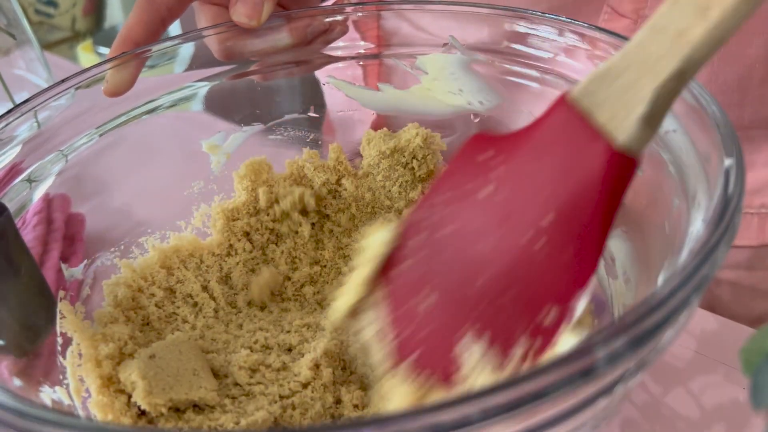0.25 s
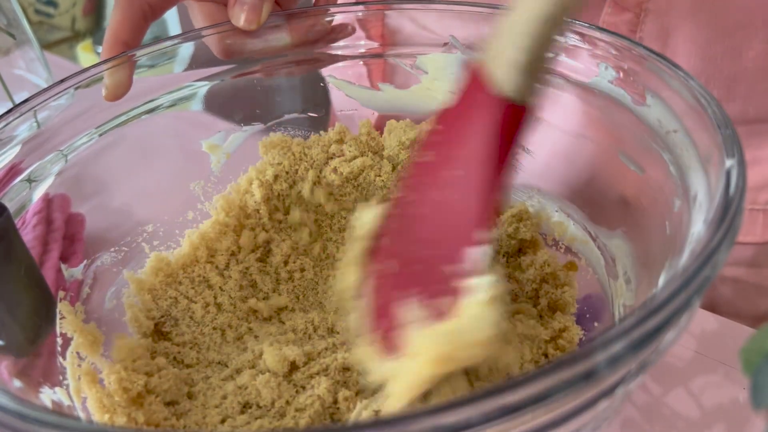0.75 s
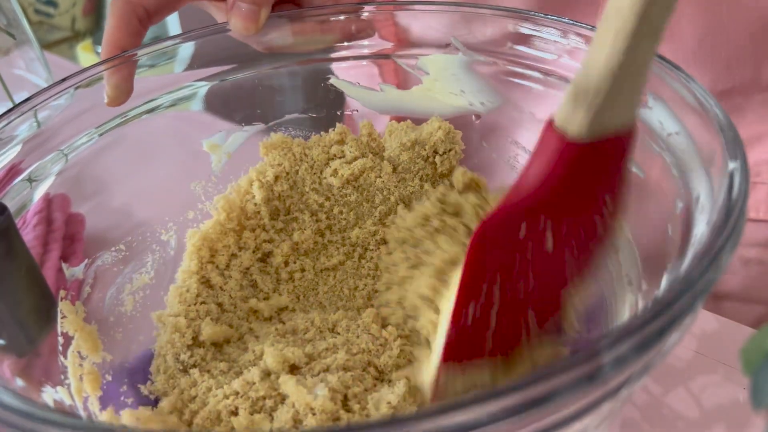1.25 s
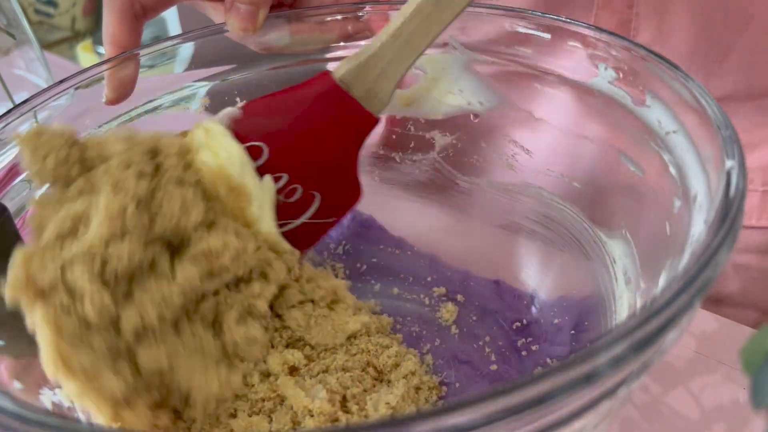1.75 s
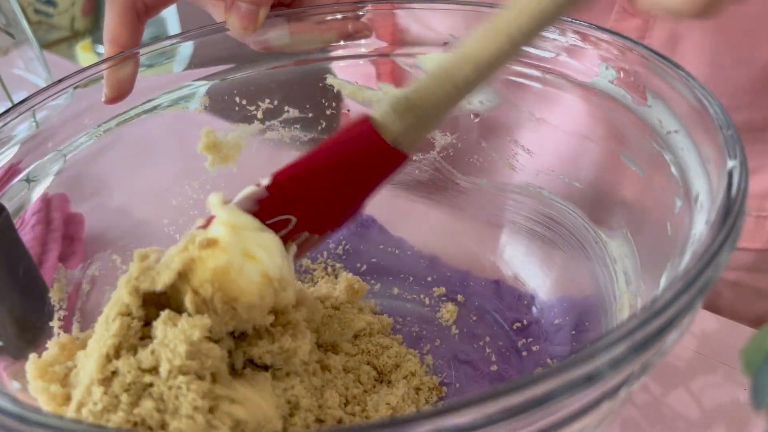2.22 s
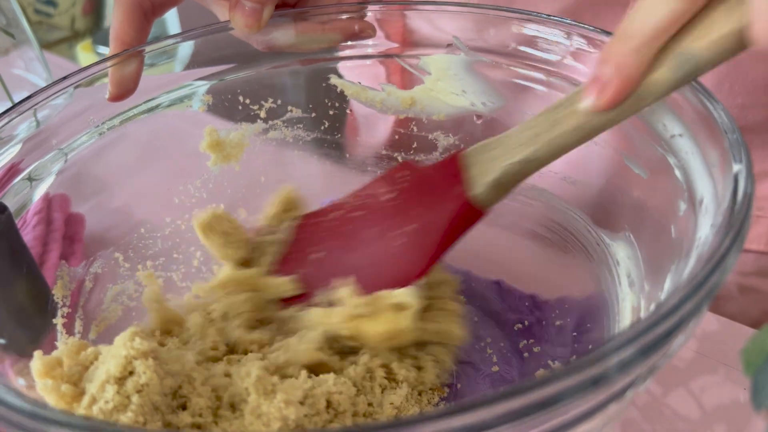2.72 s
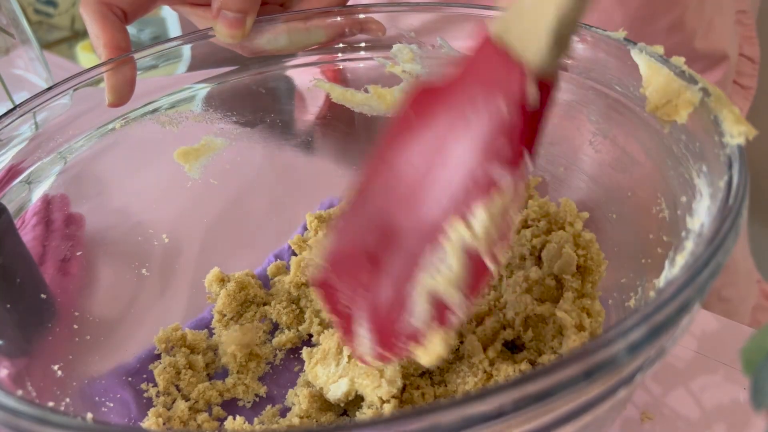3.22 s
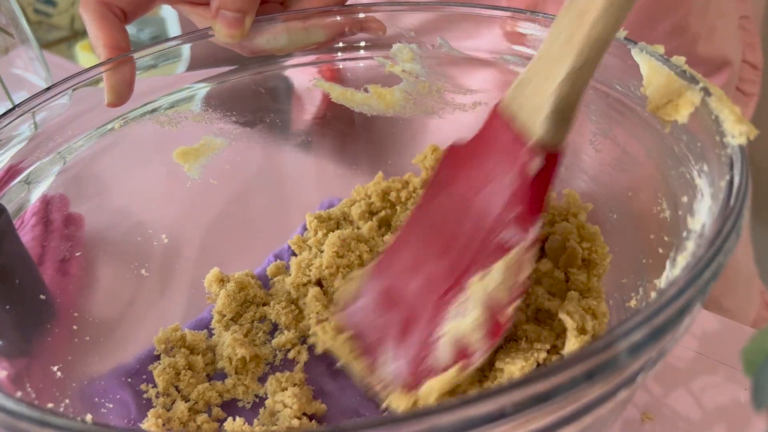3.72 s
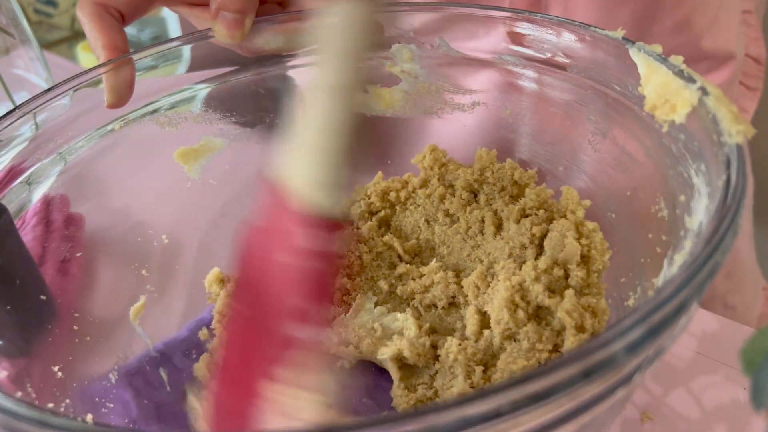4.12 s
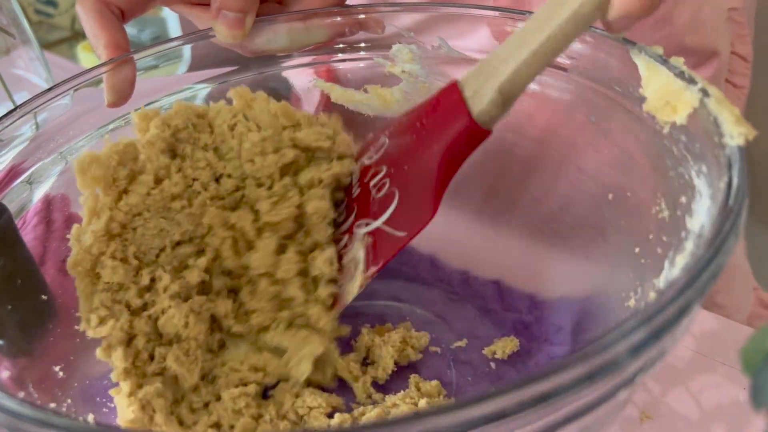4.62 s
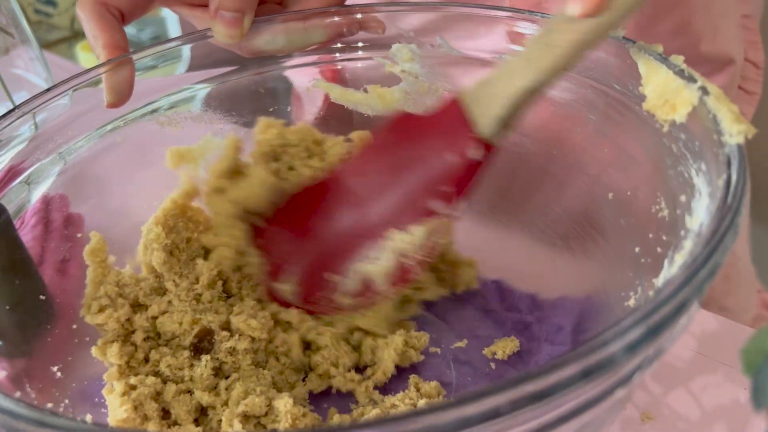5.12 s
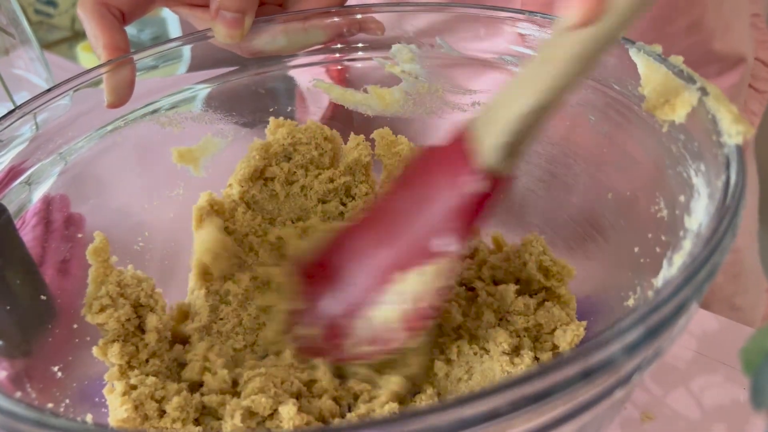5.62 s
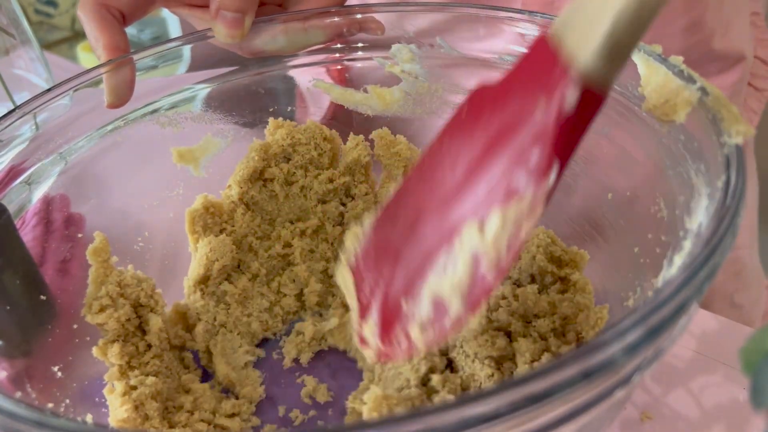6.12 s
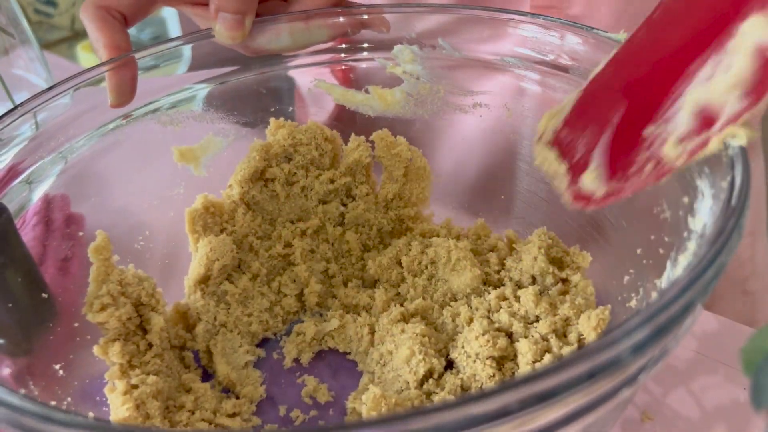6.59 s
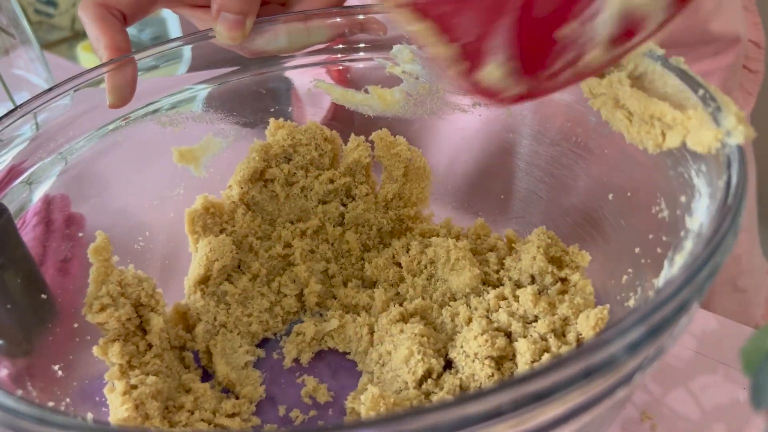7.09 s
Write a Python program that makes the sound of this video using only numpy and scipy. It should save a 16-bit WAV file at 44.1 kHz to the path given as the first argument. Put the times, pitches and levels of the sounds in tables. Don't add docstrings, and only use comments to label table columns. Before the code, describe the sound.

A silicone spatula pushes and sweeps damp, gritty sugar around a glass bowl, then knocks ringing glass and taps the rim over a low fridge hum.

```python
import sys
import numpy as np
from scipy import signal
from scipy.fft import rfft, irfft, next_fast_len
from scipy.io import wavfile
from scipy.ndimage import uniform_filter1d

SR = 44100
rng = np.random.default_rng(int(sys.argv[2]) if len(sys.argv) > 2 else 0)


def put_to_file(sound):
    columns = np.atleast_2d(sound).T
    safe = np.clip(columns, -1, 1)
    whole_steps = np.round(safe * 32767)
    wavfile.write(sys.argv[1], SR, whole_steps.astype(np.int16))


def gain_from_db(level_db):
    decades = np.asarray(level_db, float) / 20
    return 10 ** decades


N = 324135
STEP = 64

# pitch_hz [Hz], level_db [dB per Hz]
RUMBLE_COLOUR = [(13, -84), (22, -8), (59, -0.5), (131, -2.5), (204, -9), (247, -9.5), (302, -17),
                 (700, -39), (910, -47), (1540, -120)]
HISS_COLOUR = [(290, -5.5), (500, -7.5), (600, -27), (900, -17.5), (1200, -18.5), (2300, -18.5),
               (2700, -27), (3750, -28.5), (12500, -34), (13500, -38), (16000, -61)]
# pitch_hz [Hz], width_hz [Hz], level_db [dB]
MOTOR_TONES = [
    (51.03, 4.2, -50),
    (62.1, 11, -50),
    (119.18, 9.8, -50.5),
    (173.57, 7.6, -58),
    (239.3, 4.1, -59.5),
]
# pitch_hz [Hz], level_db [dB per Hz]
FIZZ_COLOUR = [(1200, -22), (2000, -6), (3500, -5), (6100, -6), (7500, -1), (9000, 1), (10400, -9),
               (11800, -1), (13800, -6), (15300, -5)]
DRAG_COLOUR = [(210, -47), (350, 2), (542, -3), (597, -2), (868, -12.5), (1260, -4), (1960, -4.5),
               (2470, -6.5), (3200, -8), (4500, -9.5), (5850, -16), (9900, -120)]

# start_s [s], hold_s [s],
# pressure_db [dB], flatness_db [dB], dryness_db [dB]
SLIDES = [(0.0, 0.11, -80, 13.5, -12), (0.352, 0.2, -81, 13.5, -11.5), (0.591, 0.035, -77.5, 14, -18),
          (2.001, 0.046, -69.5, -12, -23), (2.11, 0.088, -71.5, -21, -16), (2.234, 0.11, -75, -8, -12.5),
          (3.266, .12, -73.5, 5, -13.5), (2.964, 0.052, -92.5, 20.5, -7), (3.653, 0.089, -75, 5, -11),
          (4.626, 0.058, -84, 13, -14), (4.882, 0.081, -83.5, 10.5, -13), (4.991, 0.22, -69.5, 6.5, -12),
          (5.525, .1, -71, 7.5, -11), (5.929, 0.039, -74.5, 6, -10.5), (7.104, 0.038, -78.5, -8, -18),
          (2.385, 0.062, -89.5, 6, -10), (5.698, 0.082, -92, 5, -7), (5.85, 0.036, -80, 14, -13),
          (2.466, 0.087, -81.5, 8, -15),
    (2.575, .03, -80.5, 11.5, -21),
    (2.606, 0.042, -73.5, 12, -13),
    (2.654, 0.098, -74, 14.5, -13),
    (6.404, 0.028, -83, 5, -20),
    (6.443, 0.025, -79.5, 14, -23),
    (6.346, 0.01, -75.5, 15, -20),
    (6.404, 0.12, -87, 19.5, -24),
    (6.536, 0.048, -73.5, 6, -21),
    (6.66, 0.2, -77.5, 7, -19),
]
# start_s [s], hold_s [s], pressure_db [dB], flatness_db [dB],
# dryness_db [dB]
JABS = [
    (0.463, 0.027, -77.5, 15, -16),
    (0.859, 0.0071, -69.5, 8.5, -8),
    (2.857, 0.03, -77, 12.5, -18),
    (3.193, 0.063, -77, 9, -7),
    (3.956, 0.0065, -66.5, 1.5, -4.5),
    (4.713, 0.1, -84.5, 8.5, -17),
    (2.518, .016, -69, 3.5, -10),
    (3.573, .035, -77, 9.5, -12),
    (5.42, 0.046, -73, 6.5, -8.5),
]
# time_s [s], pressure_db [dB], flatness_db [dB], hollow_db [dB re pressure],
# hollow_hz [Hz]
SWEEPS = [
    [(.875, -72, 7.5, -14, 1630), (.92, -68.5, 0.5, -8, 1540), (1.03, -65, 6.5, -5, 1300),
     (1.12, -61.5, -5, -3, 1340), (1.2, -62, 0, 4, 1210), (1.26, -68, 5, 9, 1177),
     (1.33, -62, 0, -10, 1300), (1.6, -66.5, 0.5, -4.5, 1250), (1.86, -82.5, 5.5, 0, 1170),
     (1.98, -76.5, -2, -29, 1300)],
    [(3.99, -90.5, 22, -7, 1440), (4.05, -78.5, 10.5, -7, 1520), (4.12, -66.5, 2, -29, 1490),
     (4.2, -65.5, 1.5, -5, 1310), (4.285, -66, 2.5, 6, 1300), (4.35, -65, 0, 2, 1300),
     (4.44, -63.5, -2, -12, 1350), (4.5, -66, 0.5, -12, 1400), (4.515, -71.5, 1, -12, 1400),
     (4.58, -80.5, 6, -9, 1440)],
]

# start_s [s], peak_db [dB], pitch_hz [Hz]
SNAPS = [(.4703, -37, 3200), (.8625, -45, 8300), (1.0973, -41, 3500), (1.1098, -37, 9300),
         (1.1522, -33, 6500), (1.2268, -35, 7000), (1.2707, -30, 10000), (1.2805, -35, 11500),
         (1.5986, -26, 11000), (2.5212, -50, 11500), (2.6583, -26, 5000), (2.856, -55, 2750),
         (3.192, -56, 7000), (3.2682, -50, 7500), (4.7255, -46, 9300), (4.9238, -55, 9000),
         (5.4565, -44, 7000), (6.504, -46, 4000), (6.5678, -40, 6500), (6.7966, -37, 4300),
         (6.4045, -41, 8000), (6.5902, -37, 8000)]
# start_s [s], peak_db [dB], pitch_hz [Hz],
# length_ms [ms]
TAPS = [(2.389, -55.5, 2200, 0.47), (2.6355, -27.5, 3140, 1.1), (2.6583, -30.5, 1800, 0.18),
        (3.9546, -51, 2600, .35), (6.322, -45.5, 940, 2.9), (6.3235, -31, 11000, 1.3),
        (1.27, -34, 15000, .3), (1.2705, -40, 6000, .4), (3.79, -60, 12000, .6), (6.3485, -39, 9400, 1.4),
        (6.5678, -41, 11000, .8), (1.5987, -38, 15000, .3), (1.097, -42, 12500, .3),
        (6.4045, -54, 6200, .5), (6.4512, -48, 13500, .5), (6.7397, -50, 4500, 0.45),
        (6.7968, -51, 5900, .5), (6.7757, -54, 3880, 2.5), (7.341, -39, 7700, 1.8)]
# start_s [s], hold_s [s], level_db [dB], pitch_hz [Hz]
POCKETS = [(.9, .055, -70, 1800), (1, .045, -62, 2700), (1.02, 0.016, -60, 1270), (1.055, .02, -68, 2900),
           (1.12, .01, -64, 1300), (1.175, .02, -62, 1280), (1.268, .015, -60, 1250),
           (1.273, .012, -67, 2500), (1.34, 0.053, -62, 1560), (1.355, .025, -62, 2200),
           (1.373, .02, -73, 4150), (1.645, .02, -68, 1800), (1.64, .03, -68, 1150), (4.15, .04, -73, 3650),
           (4.1, .02, -69, 2600), (4.16, .025, -66, 2800), (4.185, .05, -70, 2080), (4.183, .02, -71, 1340),
           (4.266, .03, -60.5, 1300), (4.25, 0.054, -73, 4150), (4.315, .05, -67, 2550),
           (4.343, .01, -62, 1300), (4.37, .025, -61, 1700), (4.41, .015, -64, 1500),
           (5.525, .03, -78, 3150), (5.58, .05, -74, 10000), (5.94, 0.037, -78, 9000),
           (2.869, .02, -70, 1350), (7.095, .055, -76, 6000), (2.11, 0.074, -73, 7700),
           (2.24, 0.037, -74, 6800), (3.575, .025, -74, 3030), (3.3, 0.067, -72, 2850),
           (3.265, .03, -72, 7500), (3.36, 0.033, -78, 9100)]
# start_s [s], hold_s [s], level_db [dB],
# pitch_hz [Hz]
LINGERS = [(1.63, .04, -72, 5262), (1.71, .05, -72, 5262), (1.805, .03, -76, 5262), (1.68, .07, -72, 7030),
           (1.615, .05, -74, 3710), (2.637, .013, -50, 5262), (2.675, .075, -62, 5262),
           (5.65, .1, -80, 3710), (5.96, .07, -78, 3710), (6.325, .02, -58, 5262), (6.405, .02, -62, 5262),
           (6.452, .035, -64, 5262), (6.505, .02, -68, 5262), (6.644, .015, -66, 5262),
           (6.644, .008, -60, 9480), (6.675, .01, -68, 5262), (6.72, .01, -70, 5262),
           (6.798, .01, -64, 5262), (6.824, .012, -68, 5262), (6.59, .015, -60, 3710),
           (6.453, .035, -70, 14800)]
# start_s [s], hold_s [s], level_db [dB], tilt_db [dB per octave]
RUBS = [(1.547, 0.11, -93, 19.5), (1.646, 0.11, -79, 1.5), (3.664, 0.049, -81, -6), (4.324, 0.2, -81.5, 13),
        (4.6, 0.2, -92, -6), (4.882, 0.18, -83.5, -5.5), (5.184, 0.087, -87, -6), (5.543, 0.14, -81, -6),
        (5.88, 0.11, -79.5, -6.5), (6.362, 0.013, -69.5, -7), (6.425, 0.15, -92, -7),
        (6.527, 0.039, -66, -5), (6.61, 0.059, -76.5, -6.5), (6.704, 0.039, -71.5, -5.5),
        (6.756, 0.039, -72, -2.5), (1.68, .008, -77, -4), (1.71, .04, -84, 3), (1.908, .015, -80.5, -5),
        (5.597, .015, -76, -4)]
# start_s [s], level_db [dB], pitch_hz [Hz],
# length_cycles [cycles]
THUMPS = [(1.549, -38.5, 424, 1.2), (2.011, -51.5, 1090, 1.8), (2.6375, -29, 510, 3.8),
          (2.6355, -30.5, 753, 2.3), (2.6355, -35, 2387, 22), (2.705, -43, 613, 7.1),
          (2.67, -39.5, 570, 5.5), (2.6353, -27.5, 1060, 2.4), (2.637, -33.5, 322, 1.5),
          (2.652, -41, 416, 2.2), (2.668, -41, 430, 2.1), (2.722, -44, 487, 8), (2.638, -37, 176, 2.7),
          (2.645, -37, 85.5, 2.1), (2.675, -37, 119, 3.9), (2.795, -50, 340, 3), (3.953, -50, 1924, 14),
          (5.565, -56, 524, 4.2), (6.321, -33, 237, 3.1), (7.3343, -54, 1530, 7.3),
          (7.3415, -39.5, 2090, 5.1), (6.324, -46.5, 600, 4.4), (6.465, -62, 596, 3.4),
          (7.341, -38.5, 1455, 15), (7.342, -28, 650, 1.9), (7.345, -27.5, 249, 3.5)]

GLASS_HZ = [1373, 2405, 3295, 3710, 3900, 5262, 7030, 7289, 8200, 8980, 9480, 11200, 14800, 595]
# struck_db [dB], rubbed_db [dB], t60_s [s to fall 60 dB]
GLASS = [(-14.5, -13, 1), (-2, -9, 0.24), (-15.5, -37, 0.47), (-1.5, 4.5, 0.62), (-4, -4, .08),
         (-5, 0, 0.45), (-9, -9, 0.18), (-3, 2.5, 0.25), (-14, -34, 0.29), (-33, -10, 0.26),
         (-2.5, -5, 0.12), (-2.5, -12, 0.17), (-14, -19, .2), (-12, -13.5, 0.16)]
# start_s [s], blow_db [dB], hardness_db [dB per octave], free_s [s until the blade damps it]
KNOCKS = [(2.6348, -24, -5, 0.014), (1.8292, -66, 8.5, 0.039), (6.322, -34, 2, 0.013),
          (6.333, -48.5, 6.5, 0.007), (6.3485, -39.5, 3, 0.005), (6.53, -60, 5, 0.0085),
          (6.675, -64, 5, .008), (6.718, -53, -2, .008), (6.858, -58, 2.5, .008), (6.3554, -44, 4.5, 0.012),
          (6.372, -42.5, 2, 0.0045), (6.4033, -45.5, 2.5, 0.012), (6.4114, -50, -10, 0.013),
          (6.4505, -50, 6.5, 0.0059), (6.4634, -49, -3, 0.02), (6.5031, -49.5, 3, 0.043),
          (6.5426, -42, 2, 0.016), (6.5524, -47, 6.5, 0.0045), (6.5678, -48, 2, 0.004),
          (6.5889, -41.5, 0.5, 0.0032), (6.6437, -60, 6, 0.0063), (6.7394, -55, 3, 0.008),
          (6.7755, -69, 0, 0.021), (6.7966, -48, 2.5, 0.0054), (6.8214, -58, 4.5, 0.011)]
# time_s [s], level_db [dB]
ROCKING = [
    (2.645, -49),
    (2.7, -49.5),
    (2.75, -51),
    (2.785, -56),
    (2.805, -76),
]
FREE_HZ = [495, 606, 560, 1376, 2405, 3715, 5270, 7035, 7289]
# level_db [dB], apart [share heard apart by the ports]
FREE = [(-8, .4), (-13, 9.), (-17, 1.), (1.5, .15), (-5.5, .6), (-5, .6), (-7, .6), (-12, .3), (-12, .4)]

# pitch_hz [Hz], likeness [0 to 1]
LIKENESS = [(30, .995), (120, .94), (250, .85), (550, .5), (1300, .72), (5000, .72), (8500, .82),
            (10400, .97), (12200, .82), (14000, .96), (16000, .86)]
# pitch_hz [Hz], lead [radians]
LEAD = [(60, 0), (600, -.3), (1700, .3), (2840, -1.1), (3500, -.4), (4600, -.2), (5900, -.6), (6800, -.1),
        (7600, -1.1), (8400, -.3), (9200, .4), (9950, 2.95), (10950, 3.3), (11700, 6.1), (12700, 6.4),
        (13300, 8.9), (13700, 9.4), (14300, 9.5), (15200, 12.5), (16700, 12.4)]
# pitch_hz [Hz], left_minus_right_db [dB]
BALANCE = [(60, -1), (250, -2.6), (600, -3.5), (1300, -1.5), (2500, -4.5), (5000, -3), (8000, -.3),
           (16000, 0)]

RISE_DB_PER_S, SAG_DB_PER_S, FALL_DB_PER_S = 488, 13.5, 363
ROUND_S, JAB_ROUND_S = .012, .004


def evened(x):
    return x / np.sqrt(np.mean(x ** 2) + 1e-20)


def read(points, hz):
    f, value = np.transpose(points)
    return np.interp(np.log(hz + 1), np.log(f + 1), value)


def add(mix, s, sound):
    part = mix[round(s * SR):][:len(sound)]
    part += sound[:len(part)]


def coloured(x, spectrum):
    size = next_fast_len(N + SR // 10)
    gain = gain_from_db(read(spectrum, np.fft.rfftfreq(size, 1 / SR)))
    return evened(irfft(rfft(x, size) * gain, size)[..., :N])


def resonate(x, hz, width):
    r = np.exp(-np.pi * width / SR)
    if np.ndim(hz) == 0:
        bend = r * np.cos(2 * np.pi * hz / SR)
        return signal.lfilter([2 * (1 - r), -2 * (1 - r) * bend], [1, -2 * bend, r ** 2], x)
    turn = np.exp(2j * np.pi * np.cumsum(hz) / SR)
    return 2 * (turn * signal.lfilter([1 - r], [1, -r], x / turn)).real


def resonate_twice(x, hz, width):
    return resonate(resonate(x, hz, width), hz, width)


def band(x, lo_hz, hi_hz):
    sos = signal.butter(4, [lo_hz, hi_hz], "bandpass", fs=SR, output="sos")
    return np.std(signal.sosfilt(sos, x[0]))


def held(start, hold, db, fall, rise=RISE_DB_PER_S, round_s=ROUND_S):
    t = np.arange(0, N, STEP) / SR - start
    db = db + np.minimum(rise * t, -SAG_DB_PER_S * t) - fall * np.maximum(t - hold, 0)
    return uniform_filter1d(db, max(round(round_s * SR / STEP), 1))


def spread(control):
    return np.interp(np.arange(N), np.arange(0, N, STEP), control)


def kitchen():
    air = rng.standard_normal((2, N))
    drone = sum(gain_from_db(db) * evened(resonate_twice(air, hz, width)) for hz, width, db in MOTOR_TONES)
    rumble = gain_from_db(-49.5) * coloured(rng.standard_normal((2, N)), RUMBLE_COLOUR)
    hiss = gain_from_db(-68.5) * coloured(rng.standard_normal((2, N)), HISS_COLOUR)
    return drone + rumble + hiss


def grains(per_s, spread_db, flutter_db):
    slips = rng.exponential(1, N)
    size = gain_from_db(spread_db * np.minimum(slips, 3.8)) * (rng.random(N) < per_s / SR)
    burst = signal.lfilter([1], [1, -.9], size ** 2) ** .5
    flutter = evened(uniform_filter1d(uniform_filter1d(rng.standard_normal(N), 900), 900))
    return evened(burst * rng.standard_normal((2, N)) * gain_from_db(flutter_db * flutter))


def patchy(x, depth_db):
    z = signal.stft(x, nperseg=512)[2]
    field = rng.standard_normal(z.shape[:0:-1]).T
    for _ in range(2):
        field = uniform_filter1d(uniform_filter1d(field, 7, 0), 12, 1)
    return signal.istft(z * gain_from_db(depth_db * evened(field)), nperseg=512)[1][:, :N]


def played():
    t = np.arange(0, N, STEP) / SR
    hollow_hz, power = 1300 + 0 * t, 0
    soft_bite = (FALL_DB_PER_S,)
    jab_bite = (500, 1600, JAB_ROUND_S)
    for contacts, bite in [(SLIDES, soft_bite), (JABS, jab_bite)]:
        for s, hold, db, flat_db, dry_db in contacts:
            hollow_db = -19 + 1.7 * flat_db
            layers_db = np.array([[0], [dry_db], [flat_db], [hollow_db]])
            power = power + gain_from_db(2 * (held(s, hold, db, *bite) + layers_db))
    for s, *columns in map(np.transpose, SWEEPS):
        db, flat_db, air_db, hz = (np.interp(t, s, c) for c in columns)
        ends_db = np.minimum(RISE_DB_PER_S * (t - s[0]), 0) - FALL_DB_PER_S * np.maximum(t - s[-1], 0)
        dry_db = 0.66 * (db + 52)
        layers_db = np.array([0 * t, dry_db, flat_db, air_db])
        power = power + gain_from_db(2 * (db + ends_db + layers_db))
        hollow_hz = np.where(ends_db > -40, hz, hollow_hz)
    return map(spread, (*np.sqrt(power), hollow_hz))


def strokes():
    fizz_gain, top_gain, drag_gain, hollow_gain, hollow_hz = played()
    fizz_drive = grains(per_s=5000., spread_db=2.2, flutter_db=.9)
    fizz = patchy(coloured(fizz_drive, FIZZ_COLOUR), depth_db=1.8)
    top = signal.sosfiltfilt(signal.butter(4, 10300, "highpass", fs=SR, output="sos"), fizz)
    fizz = (fizz_gain * (fizz - top) + gain_from_db(10.0) * top_gain * top) / band(fizz, 5450, 6800)

    drag_drive = grains(per_s=3000., spread_db=2.2, flutter_db=1.5)
    drag = patchy(coloured(drag_drive, DRAG_COLOUR), depth_db=1.6)
    drag /= band(drag, 1430, 2370)

    hollow = evened(resonate_twice(drag, hollow_hz, 470.0))
    hollow = hollow + gain_from_db(-11.0) * resonate(drag, 2.1 * hollow_hz, 300.0)
    paste = gain_from_db(0.56) * fizz + gain_from_db(-3.0) * drag_gain * drag + hollow_gain * hollow
    return paste + pockets(fizz_drive) + singing()


def snaps(grit=0.29, snap_ms=0.24):
    out, t = np.zeros(N), np.arange(800) / SR
    for s, db, hz, ms in [(*row, snap_ms) for row in SNAPS] + TAPS:
        u = t / (ms / 1000)
        drive = (t == 0) + grit * rng.standard_normal(len(t)) * u * np.exp(1 - u)
        burst = np.diff(resonate_twice(drive, hz, .8 * hz), prepend=0)
        add(out, s, gain_from_db(db) * burst / abs(burst).max())
    return out


def room(x):
    t = np.arange(SR // 4) / SR
    echoes = rng.standard_normal((2, len(t))) * (rng.random((2, len(t))) < .05)
    tail = echoes * gain_from_db(-60 * t / 0.41) * (t > .002)
    return signal.oaconvolve(x[None], tail / np.linalg.norm(tail[0]), axes=1)[:, :N]


def pockets(drive):
    out = np.zeros((2, N))
    pocket_q, linger_q = 5., 60.
    for s, hold, db, hz, q in [(*row, pocket_q) for row in POCKETS] + [(*row, linger_q) for row in LINGERS]:
        part = slice(round((s - .06) * SR), round((s + hold + .06) * SR))
        level = gain_from_db(held(s, hold, db, fall=500, rise=1200, round_s=JAB_ROUND_S))
        gain = np.interp(np.arange(part.start, part.stop), np.arange(0, N, STEP), level)
        out[:, part] += gain * evened(resonate_twice(drive[:, part], hz, hz / q))
    return out


def singing():
    drive = grains(per_s=3000., spread_db=2., flutter_db=1.2)
    rub_db = np.array([held(s, hold, db, fall=273) for s, hold, db, _ in RUBS])
    tilt, out = np.transpose(RUBS)[3][:, None], 0
    for hz, (_, db, t60) in zip(GLASS_HZ, GLASS):
        gain = spread(gain_from_db(db + rub_db + tilt * np.log2(hz / 3700)).sum(0))
        width_hz = 31 / t60 * (hz / 3700) ** 0.48
        out = out + resonate(gain * drive, hz, width_hz) * t60 ** .5
    return gain_from_db(28.5) * out


def thumps():
    out, t = np.zeros((2, N)), np.arange(7000) / SR
    for s, db, hz, cycles in THUMPS:
        shape = gain_from_db(db) * (1 - np.exp(-t * hz * 10.0)) * np.exp(-t * hz / cycles)
        add(out[0], s, shape * np.sin(2 * np.pi * hz * t))
        add(out[1], s, shape * np.cos(2 * np.pi * hz * t))
    return out


def knocks():
    out, t = np.zeros(N), np.arange(SR // 5) / SR
    hz, (db, _, t60) = np.array(GLASS_HZ)[:, None], np.transpose(GLASS)[:, :, None]
    for s, blow_db, hard, free in KNOCKS:
        chance, phase = rng.standard_normal(len(t)), rng.random((len(GLASS), 2))
        damped_db = 3200.0 * (hz / 3700) ** 0.11 * np.maximum(t - free, 0)
        level_db = db + hard * np.log2(hz / 2400) + 1.3 * phase[:, :1] - 60 * t / t60 - damped_db
        twin = 1 + .004 * hz / 3700 * (phase[:, :1] - .5)
        pair = np.sin(2 * np.pi * (hz * twin * t + phase[:, 1:])) + np.sin(2 * np.pi * hz / twin * t)
        modes = gain_from_db(level_db - 5.5) * pair
        early = .85 + 2.6 * np.exp(-t / .003)
        ring = gain_from_db(blow_db - 14) * modes.sum(0) * early * (1 - np.exp(-t / .0007))

        tick_hz = min(9000 * 2 ** (hard / 5), 15000)
        dull = np.exp(-2 * np.pi * tick_hz / SR)
        tick = signal.lfilter([(1 - dull) ** 2], [1, -2 * dull, dull ** 2], chance)
        tick = gain_from_db(-4) * tick * np.exp(-t / .001)
        crunch = gain_from_db(-27 + 2.5 * hard) * resonate(chance, 11000.0, 3000.) * np.exp(-t / 0.0016)
        add(out, s, ring + gain_from_db(blow_db) * (tick + crunch))
    return out


def rocking(waver_db=1.3, waver_hz=5., fading=16.0):
    s, level_db = np.transpose(ROCKING)
    t, out = np.arange(s[0] - .0095, s[-1], 1 / SR), np.zeros((2, N))
    for hz, (db, apart) in zip(FREE_HZ, FREE):
        noise = rng.standard_normal((2, len(t)))
        swell, bend = evened(uniform_filter1d(uniform_filter1d(noise, 600), 600))
        off = abs(np.log2(hz / 1376))
        wavering_hz = hz + waver_hz * (1 + 3 * off) * (bend - bend.mean())
        angle = 2 * np.pi * np.cumsum(wavering_hz) / SR
        drop_db = 550 * np.maximum(t - 2.752, 0) * (hz > 2000)
        fade_db = fading * (t - t[0]) * off + drop_db
        blow = 1 + 3.5 * (apart > 1) * np.exp(-(t - t[0]) / .009)
        size = gain_from_db(np.interp(t, s, level_db) + db + waver_db * (1 + off) * swell - fade_db)
        size = size * blow * signal.windows.tukey(len(t), .02)
        add(out[0], t[0], size * np.sin(angle))
        add(out[1], t[0], apart * size * np.cos(angle))
    return out


def scene():
    hits = (knocks() + snaps()) * np.array([[1], [-.5]]) + thumps()
    return kitchen() + strokes() + rocking() + hits + gain_from_db(-11.) * room(hits[0])


def roll_off(x):
    return signal.sosfilt(signal.butter(12, 17100, fs=SR, output="sos"), x)


def record(dry):
    size = next_fast_len(N + 2048)
    hz, (shared, apart) = np.fft.rfftfreq(size, 1 / SR), rfft(dry, size)
    mix = np.arccos(np.clip(read(LIKENESS, hz), 0, 1)) / 2
    turn = gain_from_db(read(BALANCE, hz) / 2) * np.exp(.5j * read(LEAD, hz))
    left = (np.cos(mix) * shared + np.sin(mix) * apart) * turn
    right = (np.cos(mix) * shared - np.sin(mix) * apart) / turn
    limit = gain_from_db(-np.clip((hz - 15850) / 5, 0, 35))
    ports = irfft(np.array([left, right]) * limit, size)[:, :N]
    return roll_off(ports)


dry = scene()
out = record(dry)
put_to_file(out)
```